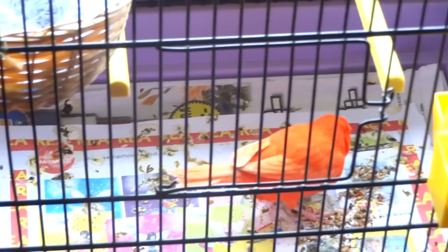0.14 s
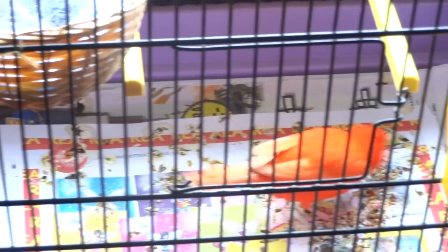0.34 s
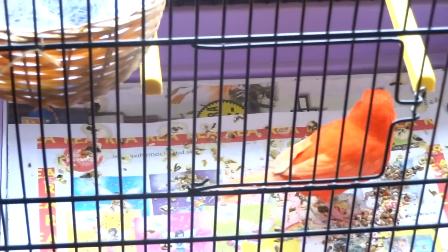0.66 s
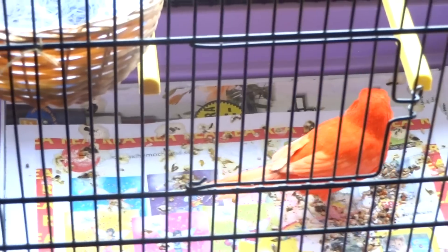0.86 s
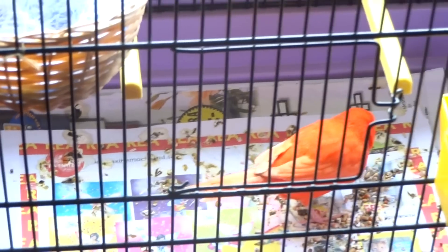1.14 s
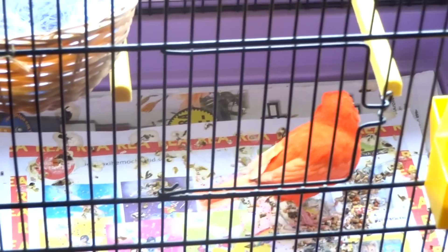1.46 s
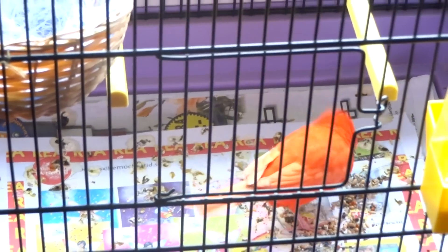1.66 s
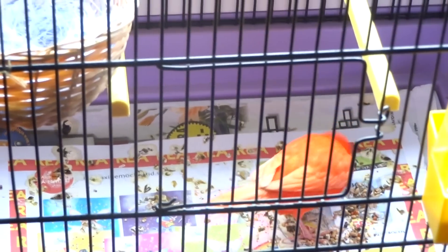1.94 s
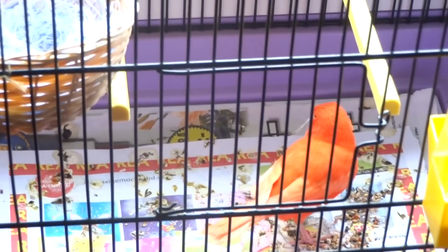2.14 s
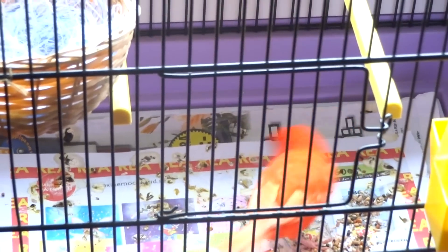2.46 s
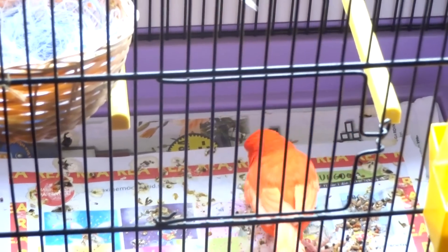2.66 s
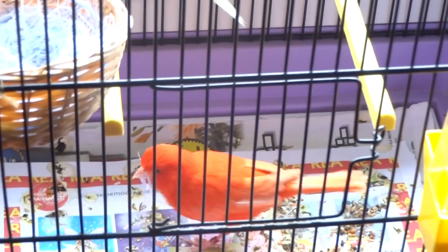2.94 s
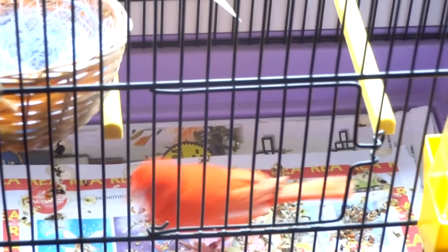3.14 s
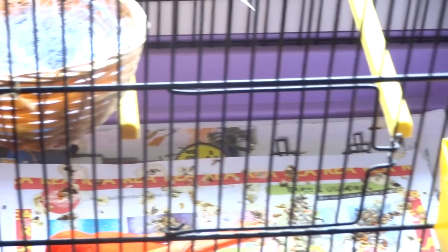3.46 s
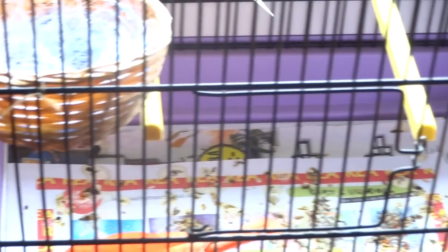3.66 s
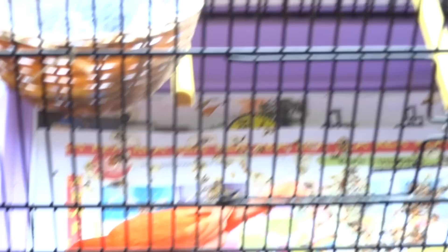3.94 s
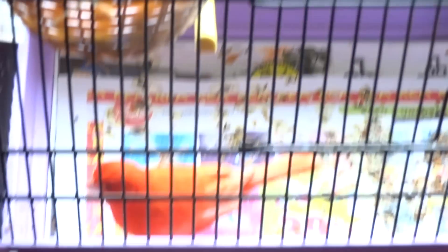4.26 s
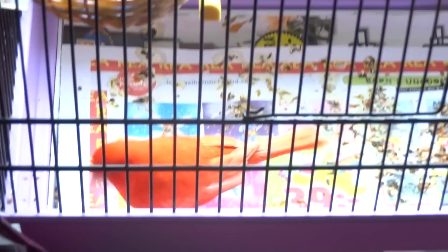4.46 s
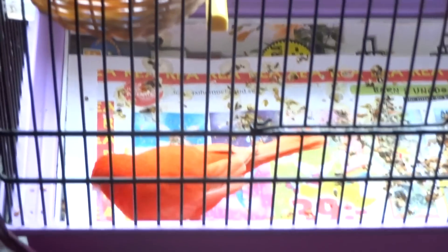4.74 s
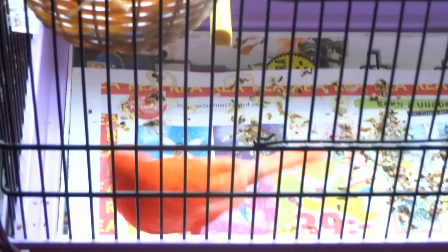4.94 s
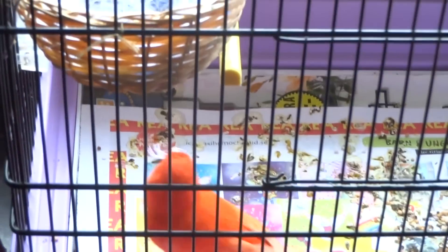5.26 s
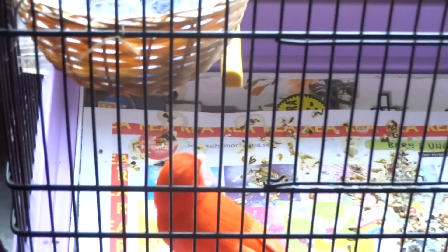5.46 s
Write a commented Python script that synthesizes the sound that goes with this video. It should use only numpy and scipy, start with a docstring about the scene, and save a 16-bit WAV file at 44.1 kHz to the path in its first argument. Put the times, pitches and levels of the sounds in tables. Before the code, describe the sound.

A close stereo pickup of a small bird hopping on newspaper and seed husks in a wire cage, in a small, lightly reverberant room. A steady soft hush and a very low, wavering hum stay throughout; a faint tonal drone fades within the first second. Tiny papery ticks come at 0.4-0.5 s, barely audible ones around 1 s. At 1.45 and 1.55 s the plastic tray gives two soft, hollow low thumps with a little husk rattle. A light scrape follows at 2.0 s, then crisp steps at 2.5 and 2.85-2.9 s with brief rustles. The busiest crackling burst, with a thump and thin wire ringing, comes at 3.2-3.35 s. Quiet scratches follow at 4.1-4.3 s and a clearer tick at 4.57 s. A soft tray bump sounds at 5.04 s, a sharp claw tap on wire at 5.32 s, then one loud, dry, woody knock at 5.46 s with a tray jolt. A few last ticks and a faint rustle end it at about 5.6 s.

```python
"""A canary hops about on the newspaper floor of a wire cage with a plastic tray, in a small room.
First a faint drone of narrow-band noise fades; a low hum (wavering sine) and hush (shaped noise) stay throughout.
Steps follow, toe then claws: noise bursts on paper, ringing the wires, among brushes of clumped crackle.
From 1.4 s jolts ring the tray (decaying sines) and make husks jump (longer noise bursts).
Near the end one hard knock sounds (filtered impulse) after two light touches; a few last steps follow."""
import sys
import numpy as np
from scipy import signal
from scipy.fft import rfft, irfft, next_fast_len
from scipy.io import wavfile
from scipy.ndimage import uniform_filter1d

SR = 44100
rng = np.random.default_rng(int(sys.argv[2]) if len(sys.argv) > 2 else 0)


def log_audio(samples):
    """Write samples as a 16-bit WAV file to the path given in sys.argv[1]."""
    # one column per channel
    frames = np.atleast_2d(samples).T
    # limit to full scale, then quantise
    limited = np.clip(frames, -1, 1)
    pcm = np.round(limited * 32767).astype(np.int16)
    wavfile.write(sys.argv[1], SR, pcm)


N = 247401
TIME = np.arange(N) / SR  # [s]

# steps and pecks: (time [s], level over 10 ms [dB], pitch of the spot [Hz], treble [dB], body [dB],
# scrape length [s]); treble counts from USUAL_TREBLE_DB
CLAWS = [(0.429, -43.5, 3300, -8.5, 7.5, 0.0048), (0.486, -50, 2880, -14, 10.5, .004),
         (1.003, -62, 5600, 0, 4, .007), (1.374, -57.5, 8000, 1, 4, 0.0043),
         (1.441, -53, 9000, 2, 15, .002), (1.559, -50.5, 9000, 0, 19, 0.0011),
         (2.011, -45, 4970, -3.5, 9.5, 0.016), (2.325, -61.5, 2500, -32, 20, .0007),
         (2.395, -54, 6600, -11, -2, 0.0068), (2.454, -52, 3400, -7, 0, .005),
         (2.481, -32, 6950, -10, 7, .001), (2.4878, -40.5, 5400, 2, 11.5, 0.0034),
         (2.839, -34, 5300, -4.5, -4, .003), (2.8863, -31.5, 5000, -6.5, -3.5, 0.0031),
         (2.895, -27.5, 8440, -9.5, 2, 0.0011), (3.041, -48.5, 5970, -5.5, -21, 0.00036),
         (3.261, -47, 5800, -9, -2, 0.0062), (3.3005, -40, 4700, -11, 4, 0.0016),
         (3.312, -31.5, 4600, -3, 1, 0.0054), (3.333, -26, 6000, -1, -2.5, 0.0026),
         (4.093, -53.5, 3700, -8, -2, 0.0035), (4.121, -52.5, 3500, -5, 5, 0.005),
         (4.202, -55.5, 5600, -8, -8, 0.0092), (4.304, -60, 8500, -4, 2, .0006),
         (4.53, -48, 5700, -4.5, -6, 0.0047), (4.573, -37, 5760, -6.5, 2.5, 0.0039),
         (5.038, -48.5, 8900, -1, 0, .003), (5.283, -46.5, 5116, -2, -12, 0.0028),
         (5.3205, -27.5, 5700, -9, 1, 0.0025), (5.444, -43, 4900, -6, 19, .008),
         (5.517, -39, 7100, 3, 10, 0.0019), (5.571, -43.5, 5930, -4, 12, .004)]
# crackle of paper and husks: (frequency [Hz], relative density [dB/Hz])
PAPER = [(100, -15), (400, -19.5), (1000, -10), (1600, -13.5), (2050, -13.5), (2600, -2.5), (3300, 1),
         (5500, 0.5), (8500, -2), (11000, -4.5), (16000, -14)]
# brushes through husks by feathers and feet: (time of peak [s], level before trim [dB], fade time constant [s])
BRUSHES = [(.45, -58, 0.079), (1.65, -69.5, 0.16), (2.51, -53.5, 0.071), (2.83, -48, 0.022),
           (3.079, -57.5, 0.021), (3.21, -49.5, 0.039), (3.349, -34.5, 0.028), (4.15, -57.5, 0.057),
           (4.615, -52, 0.029), (5.58, -54, 0.18)]
# foot catches a bar: (time [s], level over 10 ms [dB])
BAR_HITS = [(2.009, -57), (3.32, -42), (5.3206, -31)]
# wire modes before detuning: (frequency [Hz], relative level [dB], t60 [s])
WIRES = [(3400, 0, 0.085), (3550, -14, 0.16), (4200, -15, 0.19), (4670, -1, 0.22), (5140, 7, 0.13),
         (5500, 6, 0.096), (5760, -8, 0.12), (6000, 10, 0.13), (7200, 0, .15), (8150, -19, 0.092)]
# jolts of the tray, mostly landings: (time [s], peak [dB], settling time [s],
# hardness: gain of the upper modes [dB], pitch factor [1])
LANDINGS = [(1.445, -28.5, 0.0093, 1, 1.03), (1.555, -34.5, 0.0065, 2, 1.044),
            (3.293, -30, 0.0055, -8, 1.07), (5.036, -36, 0.0072, -0.5, 1.0), (5.329, -44, 0.027, 8, 1.0),
            (5.465, -35, 0.0075, 14, 1.0)]
# tray modes at pitch factor 1: (frequency [Hz], relative level [dB], t60 [s])
TRAY = [(319.6, 2.5, 0.11), (374, -14, 0.12), (451.2, -17, 0.12), (500.5, -23.5, 0.23),
        (550.4, -25.5, 0.26), (587, -22.5, .14), (1002, -22, 0.1), (1100, -27.5, 0.17), (1185, -29, 0.39),
        (1245, -26.5, 0.17), (1480, -35, 0.28), (1470, -29, 0.33), (1604, -17, 0.056), (2360, -25.5, .08),
        (2570, -38, 0.34)]
# light touches, then the blow: (time [s], level over 10 ms [dB])
KNOCKS = [(5.443, -62), (5.453, -60), (5.4607, -20.5)]
# knocked, heavily damped body: (frequency [Hz], relative density [dB/Hz])
KNOCKED = [(80, -46), (160, -27), (240, -37), (330, -28), (490, -17), (650, -30), (850, -20.5), (1080, -7),
           (1290, 0), (1450, -10), (1620, -15), (1850, -29.5), (2500, -29.5), (3300, -29), (4500, -44)]
# reverberation: (frequency [Hz], t60 [s])
ROOM_T60 = [(200, 0.5), (500, 0.94), (1300, 0.44), (3500, 0.38), (9000, 0.35), (16000, 0.16)]
# diffuse tail, added to the wet level: (frequency [Hz], gain [dB])
ROOM_COLOUR = [(200, 9.5), (320, -3.5), (480, 8.5), (700, 4.5), (1000, 5), (1600, 6), (2400, 0.5),
               (3500, -2), (14000, -3.5)]
# reverberation, side against mid: (frequency [Hz], gain [dB])
WIDTH = [(130, -13), (250, -12), (500, -10), (1200, -11.5), (2500, -12.5), (6000, -11), (14000, -19.5)]
# room hush: (frequency [Hz], relative density [dB/Hz])
HUSH = [(20, -17), (45, 1), (70, -10.5), (100, -4.5), (170, -11.5), (220, -1.5), (270, -9), (450, -11.5),
        (750, -13.5), (950, -12), (1650, -15.5), (1950, -21.5), (5000, -24.5), (15500, -31)]
# hush, side against mid: (frequency [Hz], gain [dB])
HUSH_WIDTH = [(60, -21), (110, -5.5), (200, -6.5), (380, 2.5), (700, 3.5), (1290, 2.5), (2380, 4),
              (4400, -1), (8120, -6.5), (15000, -15)]
# hush level before trim: (time [s], level [dB])
HUSH_LEVEL = [(0.0, -60.5), (1.128, -61), (1.3, -60.5)]
# faint drone in the room: (frequency [Hz], width [Hz], level before DRONE_LEVEL [dB])
DRONE = [(468, 29, -69.5), (759, 45, -67), (946, 30, -68)]
# drone envelope: (time [s], gain [dB])
DRONE_LEVEL = [(0, 1), (.3, -2.5), (.7, -4.5), (1.1, -20), (5.61, -25)]

TOE_LEAD_S, TOE_DB = .0036, -9  # toe against bite
USUAL_TREBLE_DB = -8
WIRE_DB = -13.5  # share of paper contacts that reaches the bars
BRUSH_RISE = 0.9  # rise time / fade time
# husk rattle: level against the jolt, and its rise per dB of hardness
RATTLE_DB, RATTLE_PER_HARD_DB = -20, 0.83
RATTLE_HZ, RATTLE_TREBLE_DB, RATTLE_BODY_DB, RATTLE_S = 2960, -13, 22, 0.031
HUM_HZ, HUM_DB = 48.9, -61
CUTOFF_HZ = 15900


def from_db(db):
    """Decibels to gain."""
    return 10 ** (np.asarray(db) / 20)


def unit(x):
    """Scale to an energy of one."""
    return x / np.sqrt(np.sum(x ** 2) + 1e-20)


def at_hz(points, hz):
    """Read a table on a log-frequency axis."""
    f, value = np.transpose(points)
    return np.interp(np.log(np.maximum(hz, 1)), np.log(f), value)


def at_time(points):
    """Read a (time, dB) table at every sample, as a gain."""
    return from_db(np.interp(TIME, *np.transpose(points)))


def add(track, s, sound):
    """Lay a sound into a track at a time."""
    start = int(np.clip(round(s * SR), 0, N - 1))
    track[start:start + len(sound)] += sound[:N - start]


def colour(x, gain_db):
    """Causal (minimum-phase) filter whose gain in dB is a function of frequency."""
    size = 2 * next_fast_len(len(x))
    cepstrum = irfft(np.log(from_db(gain_db(np.fft.rfftfreq(size, 1 / SR)))))
    # fold the cepstrum onto positive time
    cepstrum[1:size // 2] *= 2
    cepstrum[size // 2 + 1:] = 0
    response = np.exp(rfft(cepstrum))
    return irfft(rfft(x, size) * response)[:len(x)]


def shaped(x, points):
    """Zero-phase filter with the gains of a (Hz, dB) table."""
    size = next_fast_len(len(x), True)
    gain = from_db(at_hz(points, np.fft.rfftfreq(size, 1 / SR)))
    return irfft(rfft(x, size) * gain, size)[:len(x)]


def evened(burst):
    """Make a short burst hold all pitches about equally."""
    power = uniform_filter1d(np.abs(rfft(burst)) ** 2, size=21)
    burst_hz = np.fft.rfftfreq(len(burst), 1 / SR)
    return colour(burst, lambda hz: np.interp(hz, burst_hz, -10 * np.log10(power + 1e-9)))


def drift(rate_hz):
    """Low-passed noise with an RMS of one."""
    low_pass = signal.butter(2, rate_hz, fs=SR, output="sos")
    return unit(signal.sosfilt(low_pass, rng.standard_normal(N))) * np.sqrt(N)


def claws(toe_scrape_s=0.0027):
    """In each step a toe touches lightly, then the claws bite on the same spot."""
    out = np.zeros(N)
    for s, db, spot_hz, treble_db, body_db, scrape_s in CLAWS:
        add(out, s - TOE_LEAD_S, contact(db + TOE_DB, spot_hz, treble_db, body_db, toe_scrape_s))
        add(out, s, contact(db, spot_hz, treble_db, body_db, scrape_s))
    return out


def contact(db, spot_hz, treble_db, body_db, scrape_s, spot_db=6, spot_octaves=0.3,
            snap_s=0.00024, snap_db=-3, rise_s=0.00085, grain_db=4):
    """A snap and a short run of slips on the paper, coloured by the spot that is touched."""
    t = TIME[:SR // 16]
    snap, slips, sizes = rng.standard_normal((3, len(t)))
    snap = unit(snap * t * np.exp(-t / snap_s))
    envelope = np.exp(-t / max(scrape_s, snap_s)) * (1 - np.exp(-t / rise_s))
    slips = unit(slips * from_db(grain_db * sizes) * envelope)
    tilt = [(1700, body_db), (3000, 0), (7000, 0), (10000, treble_db - USUAL_TREBLE_DB)]

    def gain_db(hz):
        """Paper spectrum, tilt and a peak at the spot's pitch."""
        octaves = np.log2((hz + 1) / spot_hz)
        spot = spot_db / (1 + (octaves / spot_octaves) ** 2)
        return at_hz(PAPER, hz) + at_hz(tilt, hz) + spot

    sound = colour(evened(slips + from_db(snap_db) * snap), gain_db)
    return from_db(db) * unit(sound) * np.sqrt(SR / 100)  # RMS over 10 ms


def shuffle(trim_db=-1.0, grains_per_s=700, grain_db=6, clump_db=3, clump_hz=70):
    """Brushed husks and paper crackle in clumps; each brush swells and dies away."""
    grains = (rng.random(N) < grains_per_s / SR) * rng.choice([-1, 1], N)
    grain_size_db = grain_db * np.minimum(rng.standard_normal(N), 2)
    sizes = from_db(grain_size_db + clump_db * drift(clump_hz))
    effort = np.zeros(N)
    for s, db, fade_s in BRUSHES:
        distance_s = np.maximum(TIME - s, (s - TIME) / BRUSH_RISE)
        effort += from_db(db) * np.exp(-distance_s / fade_s)
    crackle = unit(shaped(grains * sizes, PAPER)) * np.sqrt(N)
    return crackle * from_db(trim_db) * effort


def rattle():
    """Every jolt of the tray throws up husks; their level rises with its hardness."""
    out = np.zeros(N)
    for s, peak_db, _, hard_db, _ in LANDINGS:
        db = peak_db + RATTLE_DB + RATTLE_PER_HARD_DB * hard_db
        add(out, s, contact(db, RATTLE_HZ, RATTLE_TREBLE_DB, RATTLE_BODY_DB, RATTLE_S))
    return out


def bar_hits():
    """Short, sharp contacts that go straight into the wire."""
    out = np.zeros(N)
    for s, db in BAR_HITS:
        add(out, s, contact(db, spot_hz=5500, treble_db=-12, body_db=0, scrape_s=.002, spot_db=12))
    return out


def bars(taps, detune=.02, count=5):
    """Many thin bars ring together, mistuned at random; the ringing has the energy of the taps."""
    modes = [(hz * (1 + detune * rng.normal()), db, t60) for hz, db, t60 in WIRES for _ in range(count)]
    rung = signal.oaconvolve(taps, ringing(modes))[:N]
    return unit(rung) * np.sqrt(np.sum(taps ** 2))


def ringing(modes):
    """Decaying sines of a struck body; each mode starts upward or downward at random."""
    t = TIME[:SR // 4]
    out = np.zeros(len(t))
    for hz, db, t60 in modes:
        decay = np.exp(-np.log(1000) * t / t60)
        out += rng.choice([-1, 1]) * from_db(db) * decay * np.sin(2 * np.pi * hz * t)
    return out


def landings():
    """The tray swings up while the bird's weight settles, then rings out; hardness lifts its upper modes."""
    out = np.zeros(N)
    for s, peak_db, settle_s, hard_db, pitch in LANDINGS:
        ring = ringing([(hz * pitch, db + hard_db * (hz > 800), t60) for hz, db, t60 in TRAY])
        ring = ring * (1 - np.exp(-(TIME[:len(ring)] / settle_s) ** 2))
        add(out, s, from_db(peak_db) * ring / np.abs(ring).max())
    return out


def knocks():
    """A hard blow on a damped body: an impulse through its broad resonances, gone quickly."""
    out = np.zeros(N)
    clonk = unit(colour(signal.unit_impulse(SR // 10), lambda hz: at_hz(KNOCKED, hz)))
    for s, db in KNOCKS:
        add(out, s, from_db(db) * clonk * np.sqrt(SR / 100))  # RMS over 10 ms
    return out


def room(x, wet_db, build_s, near_db, near_s):
    """Direct sound, quick reflections from tray and walls, and a diffuse tail with a t60 per band."""
    t = TIME[:SR // 2]
    hz = np.fft.rfftfreq(len(t), 1 / SR)
    white = rfft(rng.standard_normal((2, len(t))))
    tail = np.zeros((2, len(t)))
    edges = np.geomspace(100, 20000, 16)
    for low, high in zip(edges, edges[1:]):
        centre_hz = np.sqrt(low * high)
        band = irfft(white * ((hz >= low) & (hz < high)), len(t))
        decay = np.exp(-np.log(1000) * t / at_hz(ROOM_T60, centre_hz))
        far = unit(band * decay * (1 - np.exp(-(t / build_s) ** 2)))
        # time-reversed noise differs from the tail's
        near = unit(band[:, ::-1] * np.sqrt(t) * np.exp(-t / near_s))
        far_gain = from_db(wet_db + at_hz(ROOM_COLOUR, centre_hz))
        tail += (far_gain * far + from_db(near_db) * near) * np.sqrt(4 * (high - low) / SR)
    return x + signal.oaconvolve(x[None], spread(*tail, WIDTH), axes=1)[:, :N]


def spread(mid, other, width):
    """Left and right share the mid; a second noise, shaped by width, is the side."""
    side = shaped(other, width)
    return np.array([mid + side, mid - side])


def hush(trim_db=1.88):
    """Room hush: shaped stereo noise at a nearly steady level."""
    mid, other = [unit(shaped(white, HUSH)) * np.sqrt(N) for white in rng.standard_normal((2, N))]
    return spread(mid, other, HUSH_WIDTH) * from_db(trim_db) * at_time(HUSH_LEVEL)


def hum(waver=0.29, waver_hz=4):
    """Low sine whose amplitude and phase waver at random."""
    phase = 2 * np.pi * HUM_HZ * TIME
    wavering = drift(waver_hz) * np.sin(phase) + drift(waver_hz) * np.cos(phase)
    return from_db(HUM_DB) * (np.sin(phase) + waver * wavering)


def drone():
    """Noise in a few narrow resonances, fading mostly within the first 1.1 s."""
    tones = np.zeros(N)
    for hz, width_hz, db in DRONE:
        b, a = signal.iirpeak(hz, hz / width_hz, fs=SR)
        tones += from_db(db) * unit(signal.lfilter(b, a, rng.standard_normal(N)))
    return tones * np.sqrt(N) * at_time(DRONE_LEVEL)


def scene():
    """Bird, tray and knock sound in the same room, slightly to the left."""
    paper = claws() + rattle()
    feet = room(paper + shuffle(), wet_db=-3.5, build_s=0.002, near_db=-5.5, near_s=0.005)
    wires = bars(from_db(WIRE_DB) * paper + bar_hits())
    tray = room(landings(), wet_db=-7.5, build_s=0.022, near_db=-26, near_s=0.014)
    knock = room(knocks(), wet_db=-7.0, build_s=0.0038, near_db=-13.5, near_s=0.0066)
    pan_db = [[.3], [-.3]]  # left, right
    return (feet + wires + tray + knock) * from_db(pan_db) + hush() + hum() + drone()


def record(dry):
    """Cut the top steeply with an elliptic low-pass."""
    low_pass = signal.ellip(12, .1, 80, CUTOFF_HZ, fs=SR, output="sos")  # order, ripple dB, stopband dB
    return signal.sosfilt(low_pass, dry)


dry = scene()
out = record(dry)
log_audio(out)
```